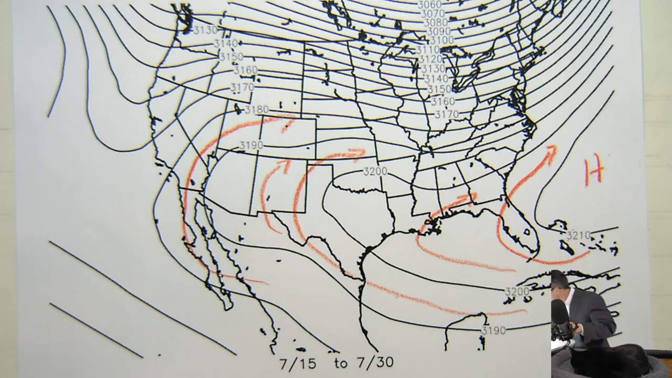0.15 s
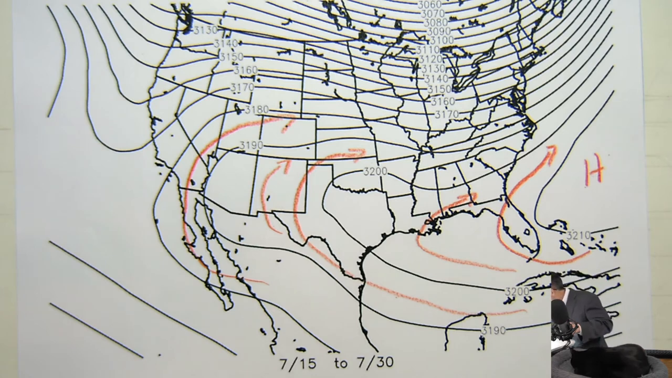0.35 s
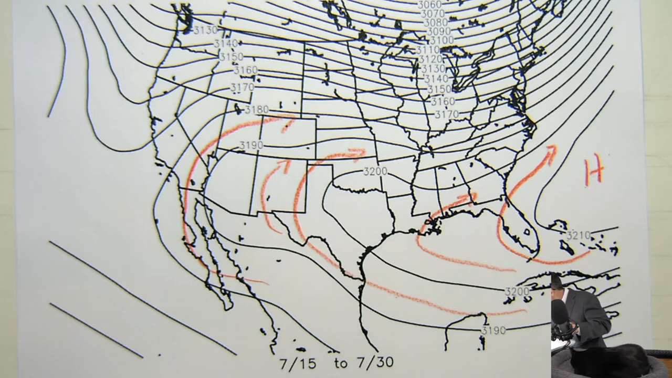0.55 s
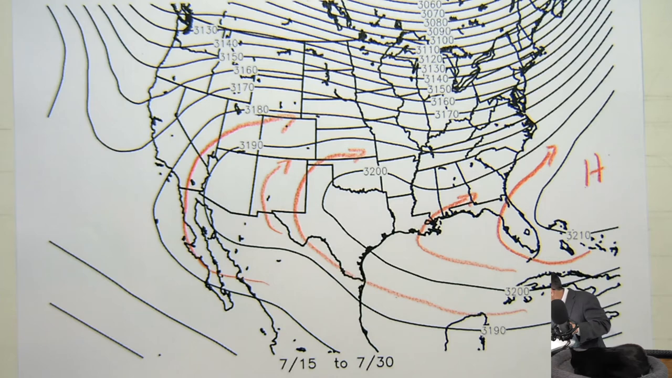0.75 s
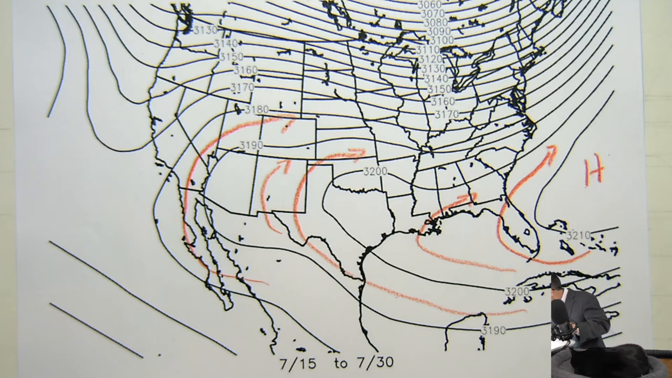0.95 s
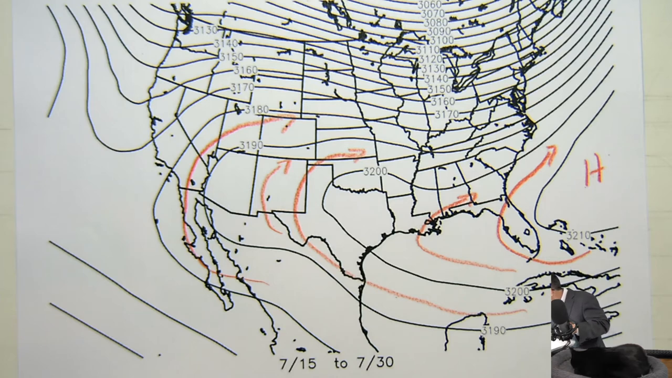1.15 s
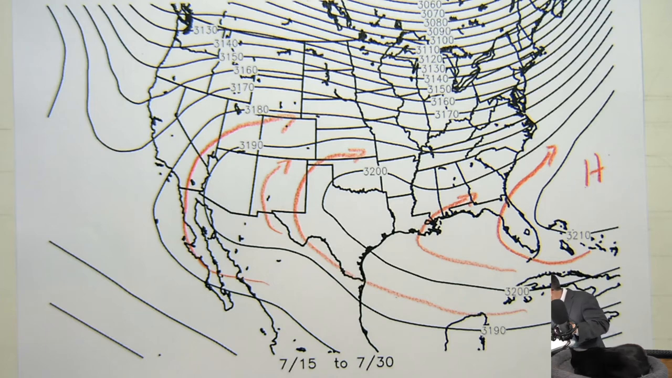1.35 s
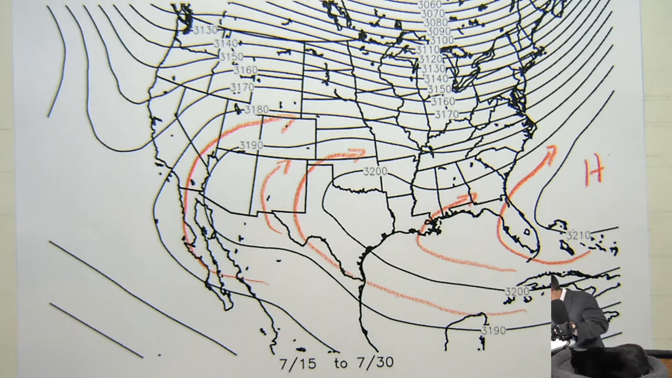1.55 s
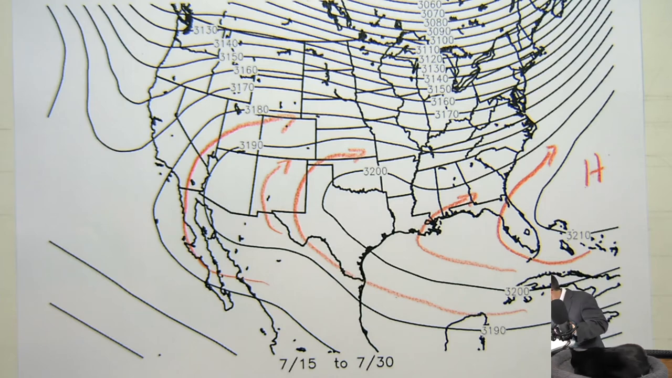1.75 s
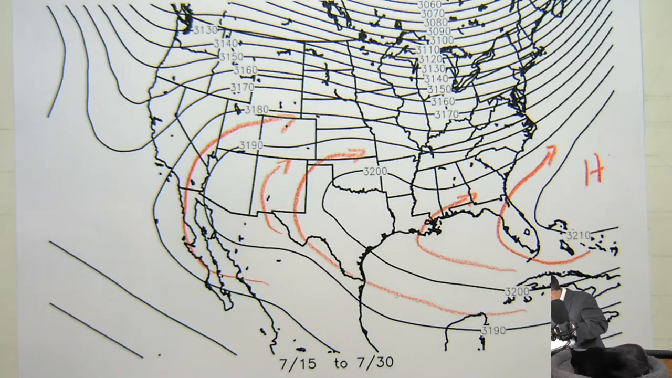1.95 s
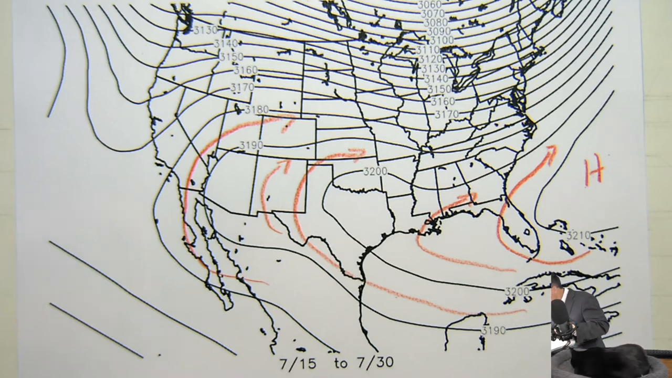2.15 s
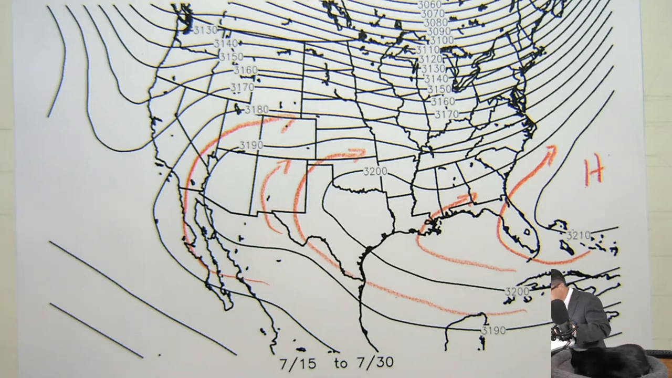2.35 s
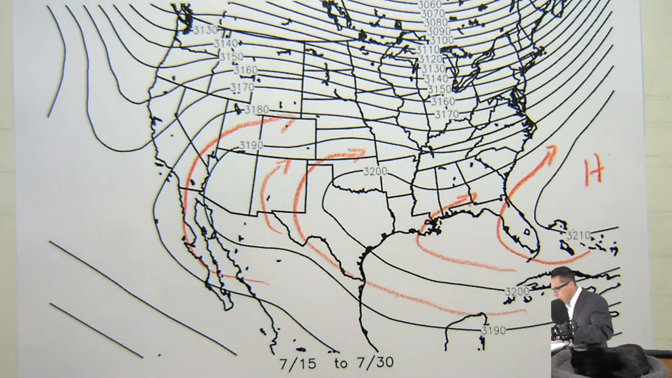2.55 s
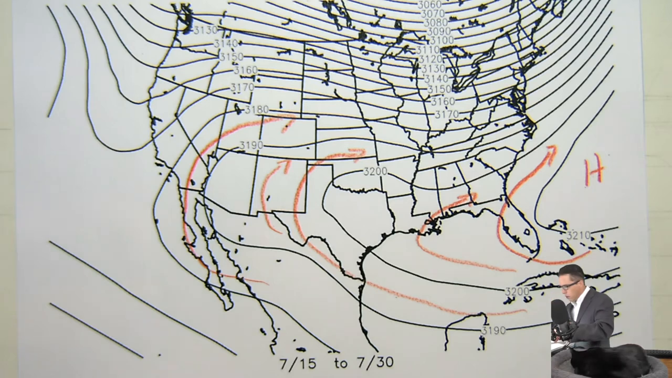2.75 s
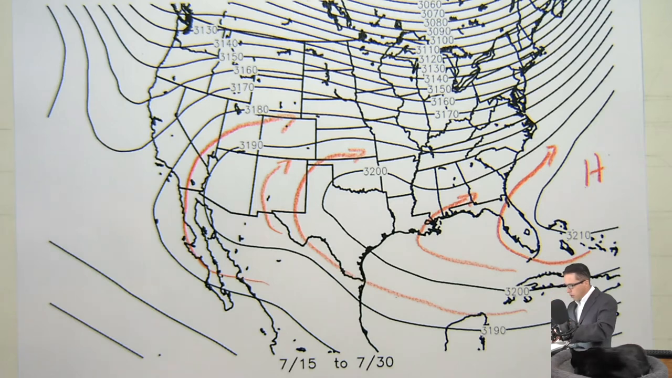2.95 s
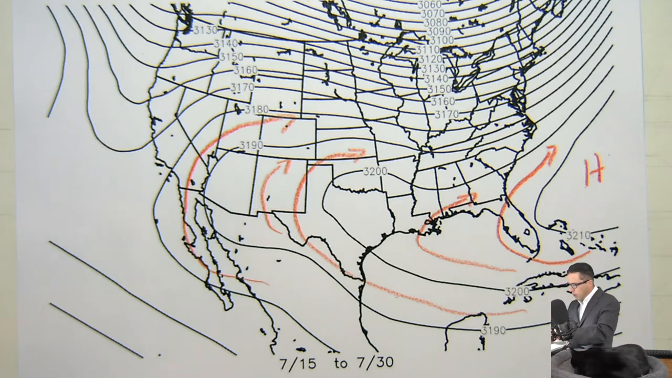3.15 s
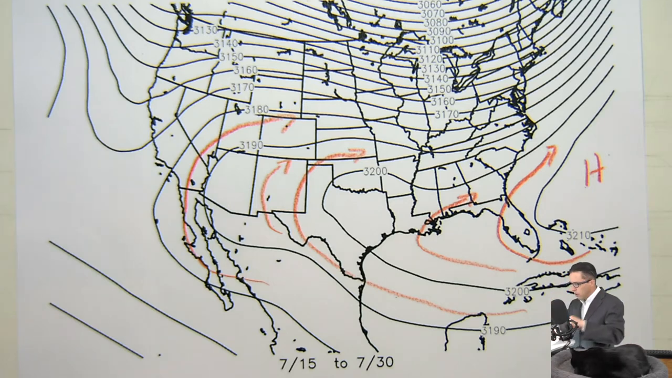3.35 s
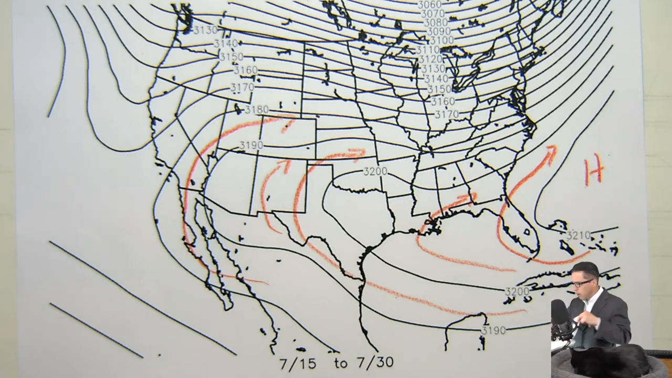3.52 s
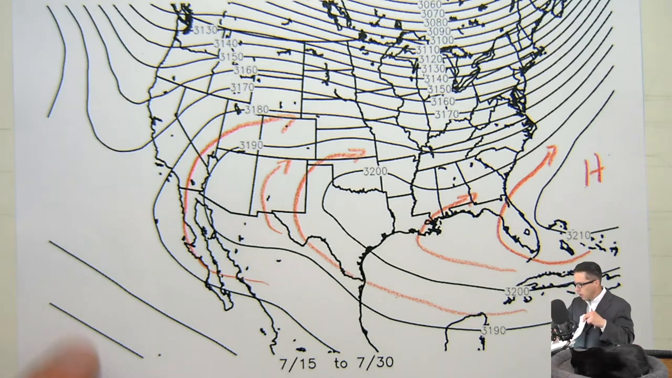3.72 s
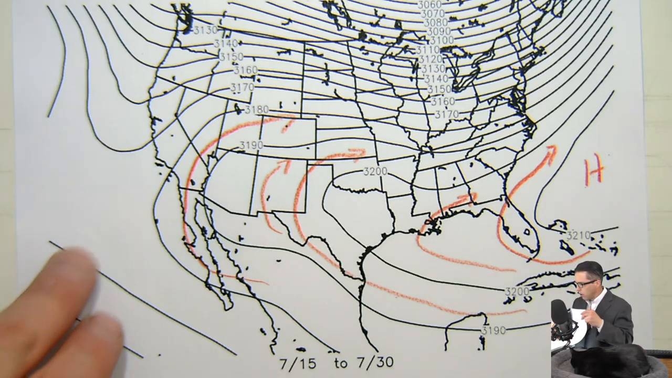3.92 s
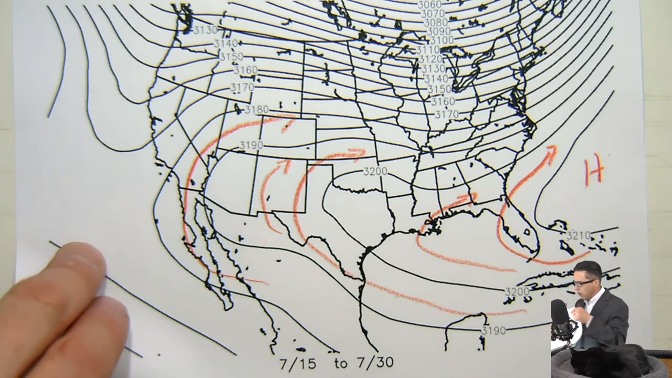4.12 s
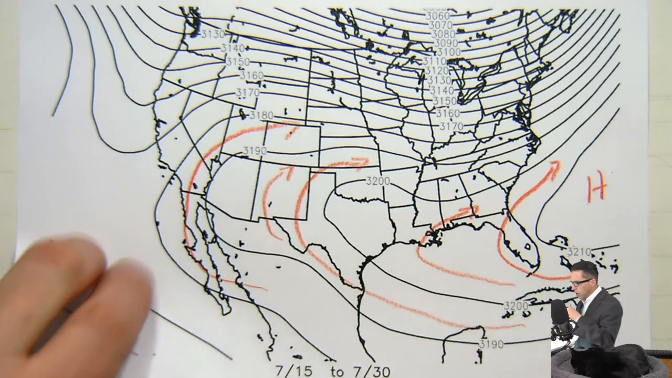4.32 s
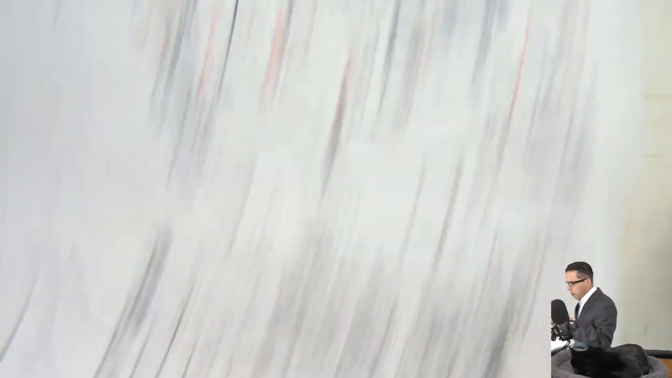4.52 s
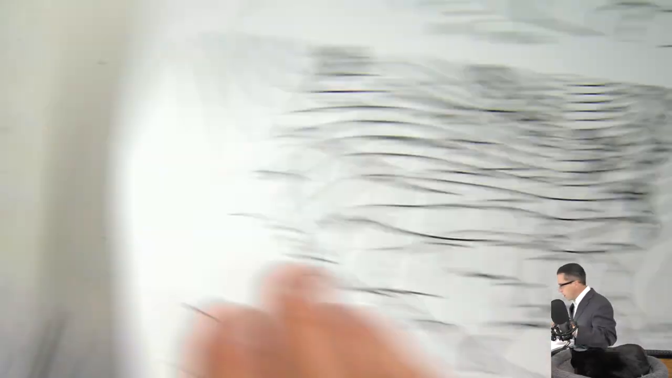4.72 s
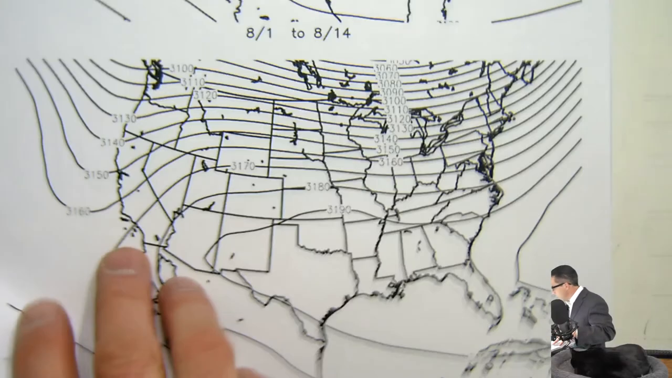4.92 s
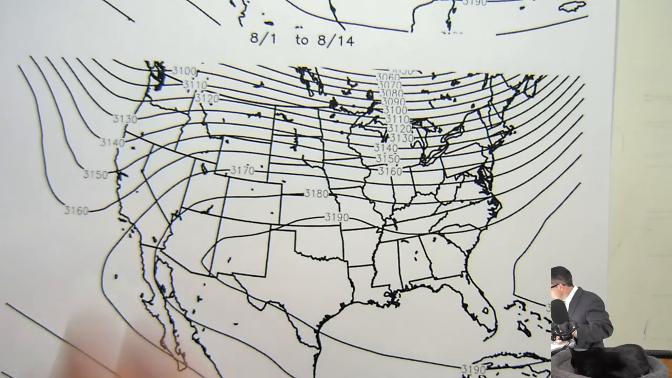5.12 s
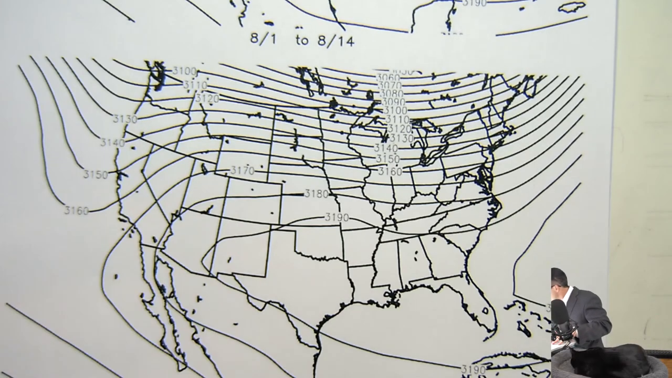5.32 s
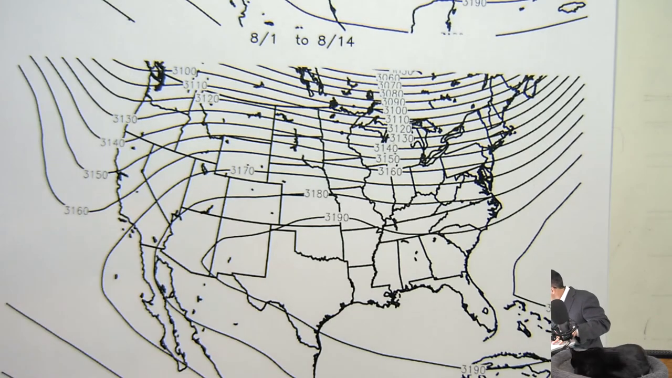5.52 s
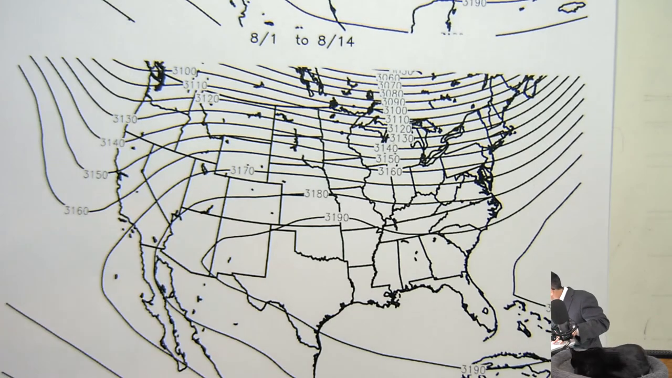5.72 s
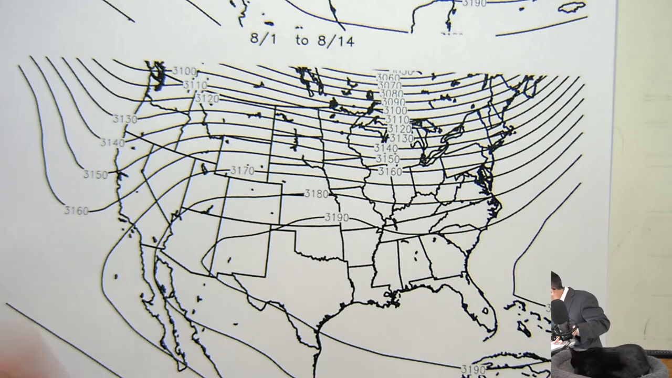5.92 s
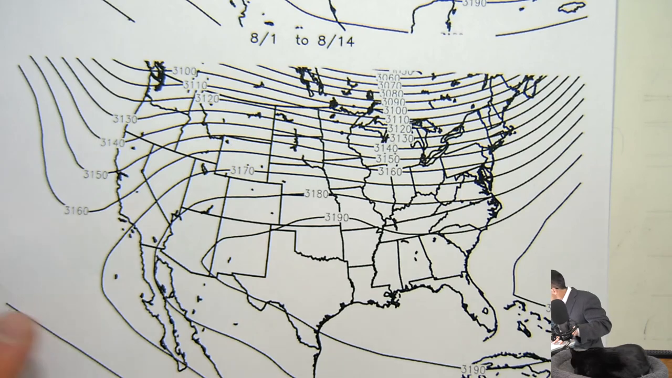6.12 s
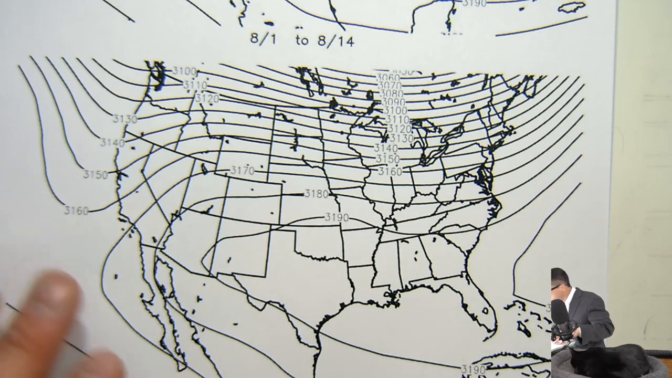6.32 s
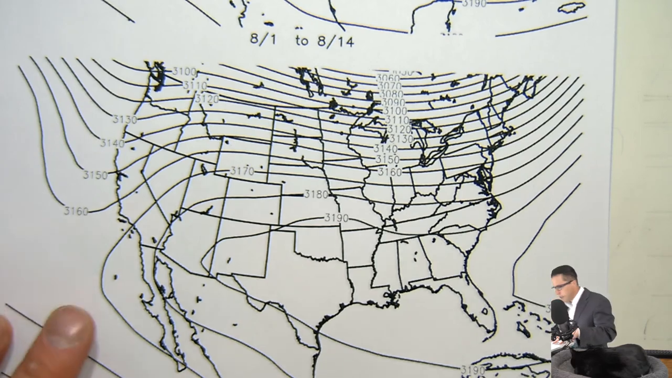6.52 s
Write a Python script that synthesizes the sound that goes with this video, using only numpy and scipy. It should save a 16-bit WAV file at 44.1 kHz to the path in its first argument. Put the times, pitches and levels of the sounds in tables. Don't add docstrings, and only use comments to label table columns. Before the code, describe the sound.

A small, dry room with a quiet low ventilation hum, a thin electronic whine and very faint low fluttering pulses repeating each second. From 0 to 1.8 s only the faintest grainy paper sliding shows above it. At 1.9 s a short crisp crinkle, then soft rubbing and tiny ticks around 2.5 s, with a dull desk thump at 2.85. At 3.1 s a hard bright snap with a swish; lighter crackles follow, then a crack and thumps at 3.6 and another at 3.7. At 4.0 s comes the loudest, sharpest crack, followed by rapid crease pops and another strong flapping cluster at 4.35. Sliding and looser crackle continue to 4.65, a small tick at 4.83, then sparse soft rustles. From 5.75 to 6.05 s a gentler crinkle with hollow pops, fading into light rubbing and hum by 6.6 s.

```python
import sys
import numpy as np
from scipy import signal
from scipy.fft import rfft, irfft, next_fast_len
from scipy.io import wavfile
from scipy.ndimage import uniform_filter1d, map_coordinates

SR = 44100
rng = np.random.default_rng(int(sys.argv[2]) if len(sys.argv) > 2 else 0)


def master_out(mix):
    frames = np.transpose(np.atleast_2d(mix))
    ceiling = np.clip(frames, -1, 1)
    pcm = np.round(ceiling * 32767).astype(np.int16)
    wavfile.write(sys.argv[1], SR, pcm)


def gain_from_db(level_db):
    decades = np.asarray(level_db, float) / 20
    return 10 ** decades


N = 289888

# (frequency [Hz], level [dB per Hz])
AIR_SPECTRUM = [(18, -11), (45, -26.5), (90, -14.5), (118, -1), (185, 0.5), (245, -5), (310, -9.5),
                (480, -10), (760, -9), (1000, -19), (1500, -19.5), (3500, -30.5), (6000, -35), (16000, -29)]
# (frequency [Hz], level [dB rms])
HUM_TONES = [(59.2, -75), (183.0, -67), (242.2, -66), (786.0, -74), (1992, -76.5), (3978, -81),
             (4597, -100.5), (5970, -96), (9954, -92), (11940, -106.5)]
# (time [s], length [s], depth [dB])
SUPPLY_SAGS = [(0.044, 0.008, -47), (0.142, .009, -47), (0.243, 0.0078, -48), (0.338, 0.012, -47),
               (0.89, 0.0051, -46), (0.904, 0.0099, -48), (0.926, 0.012, -47.5), (0.943, 0.0081, -49.5),
               (0.958, 0.0093, -45), (0.986, 0.0056, -48.5)]
# (frequency [Hz], time to fall 60 dB [s])
ROOM_DECAY = [(200, 0.23), (2000, 0.18), (10000, 0.13)]

# (centre [Hz], width [Hz], level [dB])
CREASE_MODES = [(2700, 2300, 7), (4000, 5350, 0.5)]
CAVITY_MODES = [(672, 457, 18)]
FOLD_MODES = [(1480, 1700, 0)]
SCRATCH_MODES = [(4480, 3120, -1), (9200, 5700, -0.5), (14500, 7300, -3.5)]
DESK_MODES = [(250, 460, -0.5), (431, 250, 1)]
FLAP_MODES = [(878, 796, 8), (1510, 2530, 2)]
EDGE_MODES = [(5800, 4300, 2.8), (12600, 12000, -2.5)]

# (start [s], length [s], rubbing [dB], lift [dB])
STEADY_STROKES = [(0, 0.21, -67, 7), (.9, 0.12, -78, 19), (1.191, 0.15, -69, 0), (1.45, 0.4, -71, -9),
                  (1.806, 0.29, -71, -5), (1.944, 0.064, -46.5, -10), (2.05, 0.18, -54, -5),
                  (2.246, .2, -57.5, -0.5), (2.56, 0.14, -63, 0.5), (2.722, 0.13, -68, 17),
                  (3.09, 0.048, -43.5, -1.5), (3.174, 0.16, -47, -15.5), (3.382, 0.15, -53, 1),
                  (3.608, 0.098, -43, 3), (3.78, 0.18, -52, 1.5), (4.165, 0.086, -55, 7),
                  (4.347, 0.063, -43, 3.5), (4.572, 0.11, -55.5, 11), (4.72, 0.11, -56, 1.5),
                  (4.87, 0.14, -60.5, 13.5), (5.06, 0.057, -62.5, 3), (5.15, 0.092, -69, 11),
                  (5.247, 0.12, -57.5, 4.5), (5.38, 0.12, -66.5, 10), (5.75, 0.23, -58, 5.5),
                  (6.043, 0.1, -55.5, 1), (6.3, .35, -65.5, 3.5)]
# (start [s], length [s], rubbing [dB], lift [dB], growth [dB/s])
SPEEDING_STROKES = [(2.865, 0.12, -56.5, 1.5, 22), (2.98, 0.12, -52, -22, 135), (3.72, 0.052, -45, -9, 13),
                    (3.845, .15, -44, -4.5, 25), (4.04, 0.073, -49.5, -28.5, 36),
                    (4.45, 0.095, -43.5, -10, 8), (5.56, 0.19, -75, 10, 44), (6.19, 0.13, -61, -3, 5)]
# (level over the rubbing [dB], share of the lift [1], rest level [dB])
PAPER_ANSWERS = [
    (-2.5, .15, -78),
    (-3.5, 0.98, -66),
    (-5.5, 0.54, -81),
    (-1.53, .01, -76.5),
]

# (time [s], peak level [dB], rise [ms], time to fall 60 dB [ms])
TAUT_BURSTS = [(.285, -68.5, 12, 180), (1.6, -69, 10, 130), (1.745, -75, 15, 130), (1.82, -67.5, 28, 250),
               (4.27, -55.5, 19, 120), (1.904, -36, 2.8, 56), (1.907, -30, 6.5, 26),
               (1.914, -30.5, 5.4, 207), (2.135, -50.5, 13, 260), (3.03, -70, 23.9, 119),
               (3.0755, -28, 1.5, 60), (3.0839, -18, 0.42, 34), (3.09, -31.5, 1.8, 94),
               (3.164, -44, 3.3, 43), (3.512, -46, 16, 380), (3.592, -18.5, 0.6, 17),
               (3.597, -33, 0.92, 150), (3.705, -34.5, 0.5, 18), (4.326, -58, 0.44, 12),
               (4.344, -45.5, 3.3, 44), (4.459, -44.5, 6.2, 65), (4.5, -46, 19, 66), (4.53, -45.5, 8, 57),
               (5.288, -47.5, 3.3, 100), (5.742, -44, 8.4, 340), (5.94, -52, 27, 180),
               (6.218, -59.5, 32, 300)]
FOLDED_BURSTS = [(2.706, -60, 6, 40), (3.484, -64, 1.3, 15), (3.597, -25.5, 1, 83),
                 (3.7045, -24.5, 1.3, 35), (3.712, -41, 4.6, 93), (4.0002, -10, 1.2, 22),
                 (4.0011, -10, 1.15, 11), (4.014, -37, 5, 60), (4.095, -39.5, 11, 90),
                 (4.112, -33.5, 9.5, 40), (4.122, -30.5, 3.1, 48), (4.1545, -29.5, 1.6, 70),
                 (4.173, -35.5, 5, 66), (4.325, -27.5, 1.2, 36), (4.331, -20.5, 2.3, 26),
                 (4.352, -17.5, 2.7, 28), (4.356, -21, 0.89, 86), (4.395, -41.5, 7.6, 88),
                 (4.59, -44.5, 15, 290), (4.63, -49, 14, 150), (4.965, -64, 5.3, 82),
                 (5.791, -43, 10.4, 118), (5.816, -46.5, 5.9, 380), (6.06, -52, 9.8, 130)]
SLACK_BURSTS = [(2.44, -61.5, 28, 290), (2.49, -66, 20, 90), (2.706, -70, 6.3, 57), (3.412, -51.5, 0.5, 15),
                (3.484, -54.5, 2.9, 42), (4.008, -51.5, 8, 194), (4.173, -41.5, 2.6, 46),
                (4.2, -51, 12, 28), (4.351, -36.5, 2.6, 87), (4.575, -50.5, 16, 260),
                (4.828, -30.5, 0.24, 14.4), (4.832, -44, 3.8, 177), (4.925, -59, 26, 81),
                (4.961, -47.5, 2.6, 54), (4.971, -49, 2, 92), (5.023, -57.5, 2.8, 110), (5.13, -64, 20, 80),
                (5.4, -64, 14, 150), (5.743, -49, 2, 220), (5.766, -38.5, 13.4, 220),
                (5.875, -53.5, 6.7, 77), (5.895, -59, 8.5, 280), (5.958, -56, 19, 210),
                (5.989, -53, 5.7, 53), (6.012, -60, 9.3, 67)]

# (time [s], level [dB], centre [Hz], time to fall 60 dB [ms])
STRUCK_PANELS = [(3.413, -57.5, 1094, 22), (1.911, -29, 3820, 110), (1.912, -30.5, 636, 91),
                 (1.91, -27, 10000, 130), (2.636, -56, 5500, 15), (3.078, -26, 3400, 41),
                 (3.0838, -14.5, 4810, 20), (3.084, -24.5, 9500, 75), (3.593, -22, 4400, 19),
                 (3.592, -31, 930, 99), (3.644, -28.5, 716, 51), (3.705, -28.5, 6100, 37),
                 (4.0003, -13, 3700, 16), (4.0004, -18, 2400, 30), (4.0005, -21, 942, 30),
                 (4.0005, -25.5, 560, 34), (4.175, -35, 1720, 100), (4.232, -52, 7500, 18),
                 (4.273, -48, 5540, 13), (4.355, -28, 1940, 83), (5.2, -48.5, 750, 820)]
# (time [s], level [dB], centre [Hz], time to fall 60 dB [ms])
RUBBED_PANELS = [(.61, -64, 4700, 120), (1.24, -64, 7500, 200), (1.485, -66, 6200, 60),
                 (1.535, -63.5, 6650, 90), (1.75, -65, 6000, 89.4), (3.03, -54, 6230, 70),
                 (3.04, -40, 3030, 122), (3.37, -49, 1520, 79.3), (3.92, -40.5, 2800, 300),
                 (4.59, -39, 1910, 121), (4.965, -45, 3080, 85), (5.77, -44, 1030, 171),
                 (5.785, -31.5, 2600, 111), (5.895, -40, 1860, 67), (6.0, -42, 1510, 75.4),
                 (3.355, -49, 4970, 148), (3.44, -52, 3380, 200), (5.99, -48, 2530, 250),
                 (6.2, -59, 4126, 399), (5.43, -60, 1307, 250), (2.97, -52, 485, 298),
                 (3.54, -45, 3100, 170), (2.45, -51, 880, 230), (2.455, -51, 1400, 200),
                 (2.73, -59, 1350, 500), (2.8, -50.5, 600, 400), (3.6, -44, 1560, 200),
                 (4.175, -45, 620, 300), (5.83, -48, 1500, 400), (5.99, -49, 1150, 250),
                 (3.45, -51, 4800, 120)]
# (time [s], peak level [dB], pitch [Hz], time to fall 60 dB [s])
DESK_THUMPS = [(2.46, -45.5, 286, 0.18), (2.846, -33, 237, 0.19), (2.9, -40.5, 258, 0.16),
               (3.078, -30.5, 227, 0.091), (3.595, -33.5, 264, .08), (3.644, -24.5, 269, 0.065),
               (3.345, -46, 200, 0.078), (2.632, -47.5, 328, 0.075), (2.865, -41, 300, .1),
               (4.0004, -19, 390, 0.017), (4.001, -28.5, 134.6, 0.016), (6.07, -52.5, 298, 0.122),
               (1.912, -43, 189.5, 0.14), (1.915, -46, 335, 0.13), (4.352, -25.5, 274, 0.041),
               (4.34, -36, 470, .08), (3.47, -45, 330, .15), (3.6, -40, 150, .2), (4.58, -50.5, 297, 0.25)]
# (time [s], peak level [dB], pitch [Hz], time to fall 60 dB [ms])
CREASE_POPS = [(2.4715, -40, 890, 60), (2.489, -41, 880, 40), (2.711, -45, 780, 30), (2.846, -44, 650, 33),
               (3.0841, -10, 3100, 10), (3.0841, -9, 4600, 12), (3.0841, -8, 6890, 12),
               (3.092, -18, 3100, 35), (3.123, -27, 3600, 14), (2.147, -40, 2060, 50),
               (3.166, -37.5, 820, 76), (3.384, -39, 2200, 25), (3.4139, -33, 1100, 20),
               (3.489, -37, 755, 50), (3.527, -30, 2890, 15), (3.558, -38, 700, 15), (3.857, -34, 2670, 16),
               (4.0001, -14, 520, 22), (4.0005, 0, 2700, 10), (4.0005, -20, 9000, 6),
               (4.0018, -2, 2300, 16), (4.0017, -3, 4000, 12), (4.1242, -20, 3280, 14),
               (4.1574, -20, 2800, 16), (4.1612, -24, 2100, 16), (4.181, -27, 2300, 14),
               (4.204, -32, 1900, 10), (4.21, -29, 1700, 10), (4.222, -39, 720, 25), (4.232, -40, 760, 25),
               (4.3325, -16, 2290, 25), (4.354, -15, 1930, 14), (4.354, -20, 5800, 12),
               (4.36, -11, 2120, 15), (4.3655, -21, 2900, 20), (4.372, -20, 1000, 22),
               (4.401, -31, 790, 34), (4.469, -28, 6200, 10), (4.59, -34, 760, 110), (4.972, -35, 1110, 25),
               (5.028, -42, 876, 25), (5.225, -44, 700, 40), (5.297, -35.5, 720, 30), (5.412, -43, 850, 30),
               (5.7445, -31, 900, 30), (5.772, -29, 950, 50), (5.799, -25, 2590, 14),
               (5.883, -33, 1050, 22), (5.897, -34, 1100, 30), (5.963, -35, 2760, 40),
               (5.971, -35, 1000, 25), (6.001, -33, 1340, 30), (6.023, -36, 1250, 18)]


def unit(x):
    return x / np.sqrt(np.mean(x ** 2, axis=-1, keepdims=True) + 1e-20)


def along(points, hz):
    f, values = np.transpose(points)
    return np.interp(np.log(hz + 1), np.log(f + 1), values)


def wobble(rate):
    knots = rng.standard_normal(int(N * rate / SR) + 4)
    return map_coordinates(knots, [np.arange(N) * rate / SR])


def filtered(x, response):
    size = next_fast_len(N + SR // 2)
    return irfft(rfft(x, size) * response(np.fft.rfftfreq(size, 1 / SR)), size)[..., :N]


def resonant(x, modes):
    def once(f):
        total = 0
        for k, (centre, width, db) in enumerate(modes):
            mode = 1j * f * width / (centre * centre - f * f + 1j * f * width)
            total = total + (-1) ** k * gain_from_db(db) * mode
        return total

    norm = np.sqrt(np.mean(np.abs(once(np.linspace(0, SR / 2, num=2000))) ** 4))
    return filtered(x, lambda f: once(f) ** 2 / norm)


def swell(t, rise, life):
    onset = np.sin(np.pi / 2 * np.clip(t / rise, 0, 1)) ** 2
    return onset * gain_from_db(-60 * np.maximum(t - rise, 0) / life)


def fibres(clump_db, spike_db):
    size = gain_from_db(clump_db * wobble(45) + spike_db * wobble(600))
    return unit(size * rng.standard_normal(N))


def background():
    noise = unit(filtered(rng.standard_normal(N), lambda hz: gain_from_db(along(AIR_SPECTRUM, hz))))
    air = gain_from_db(-58.5 + 1.0 * wobble(1.4)) * noise
    t = np.arange(N) / SR
    tones = np.zeros(N)
    for hz, db in HUM_TONES:
        waver_db = 2.5 if hz < 1000 else 0.6
        level = gain_from_db(db + 2.5 + waver_db * wobble(5.8))
        tones += level * np.sin(2 * np.pi * hz * t + 1.6 * wobble(11.0))
    return air + tones


def strokes(rows, t, attack_db_per_s, release_db_per_s, crease_db, fold_db):
    start, length, rub_db, lift_db, *growth = np.transpose(rows)[..., None]
    shape_db = rub_db + sum(growth) * np.clip(t - start, 0, length)
    shape_db = shape_db - attack_db_per_s * np.maximum(start - t, 0)
    shape_db = shape_db - release_db_per_s * np.maximum(t - start - length, 0)
    powers = []
    for (over_db, share, _), extra_db in zip(PAPER_ANSWERS, (crease_db, 0, fold_db, 0)):
        level = gain_from_db(shape_db + over_db + extra_db + share * lift_db)
        powers.append(np.sum(level ** 2, axis=0))
    return np.array(powers)


def patchy(x, depth_db):
    z = signal.stft(x, nperseg=256)[2]
    field = rng.standard_normal(z.shape)
    field = uniform_filter1d(field, size=4, axis=0)
    field = uniform_filter1d(field, size=14, axis=1)
    return signal.istft(z * gain_from_db(depth_db * field / field.std()), nperseg=256)[1][:N]


def rustle():
    t = np.arange(0, N + 64, 64) / SR
    power = strokes(STEADY_STROKES, t, attack_db_per_s=398.5, release_db_per_s=168.5, crease_db=0, fold_db=0)
    power = power + strokes(SPEEDING_STROKES, t, attack_db_per_s=702.5, release_db_per_s=499,
                            crease_db=-0.5, fold_db=-6.5)
    gains = []
    for part_power, (_, _, rest_db) in zip(power, PAPER_ANSWERS):
        gains.append(np.interp(np.arange(N) / SR, t, np.sqrt(part_power + gain_from_db(rest_db) ** 2)))
    paper = np.zeros(N)
    for gain, modes in zip(gains, (CREASE_MODES, CAVITY_MODES, FOLD_MODES, SCRATCH_MODES)):
        paper += gain * resonant(fibres(clump_db=1.7, spike_db=1.24), modes)
    desk = gain_from_db(-7.0) * gains[1] * resonant(fibres(clump_db=2.5, spike_db=4.0), DESK_MODES)
    return patchy(paper, depth_db=2.0) + desk


def supply():
    cycle_s, low_hz, high_hz = 1.001, 9, 140
    phase = np.arange(N) / SR % cycle_s
    dips = np.zeros(N)
    for s, length, db in SUPPLY_SAGS:
        dips -= gain_from_db(db) * ((phase > s) & (phase < s + length))
    return filtered(dips, lambda f: 1j * f / (low_hz + 1j * f) / (1 + 1j * f / high_hz) ** 2)


def snaps():
    drive = np.zeros((3, N + SR))
    t = np.arange(SR // 3) / SR
    life_ratio = np.array([[0.99], [1.3], [0.8]])
    states = ((TAUT_BURSTS, -11, 2.5), (FOLDED_BURSTS, -16.5, -17), (SLACK_BURSTS, 8.5, -31.5))
    for bursts, body_db, edge_db in states:
        for s, db, rise_ms, t60_ms in bursts:
            part_db = np.array([[0], [body_db - 0.0259 * (db + 30)], [edge_db]])
            burst = gain_from_db(db + part_db) * swell(t, rise_ms / 1000, t60_ms / 1000 * life_ratio)
            start = round(s * SR)
            drive[:, start:start + len(t)] += burst
    out = np.zeros(N)
    for part, modes in zip(drive, (CREASE_MODES, FLAP_MODES, EDGE_MODES)):
        out += resonant(part[:N] * fibres(clump_db=0.5, spike_db=1.5), modes)
    return out


def panels():
    out = np.zeros(N + SR)
    t = np.arange(SR // 2) / SR
    f = np.fft.rfftfreq(len(t), 1 / SR)
    for rings, rise, width in ((STRUCK_PANELS, 0.036, 0.23), (RUBBED_PANELS, 0.125, 0.34)):
        for s, db, hz, t60_ms in rings:
            band = 1 / (1 + (2 * (f / hz - 1) / width) ** 2)
            ring = unit(irfft(rfft(rng.standard_normal(len(t))) * band, len(t)))
            life = t60_ms / 1000
            out[round(s * SR):][:len(t)] += gain_from_db(db) * ring * swell(t, rise * life, life)
    return out[:N]


def thumps():
    out = np.zeros(N + SR)
    t = np.arange(SR // 3) / SR
    for s, db, hz, t60 in DESK_THUMPS:
        ring = np.zeros(len(t))
        for ratio, level_db in ((1, 0.5), (1.2, -2), (1.8, -8.5)):
            ring += gain_from_db(level_db) * np.sin(2 * np.pi * hz * ratio * t)
        soft_start = 1 - np.exp(-t / 0.002)
        out[round(s * SR):][:len(t)] += gain_from_db(db - 60 * t / t60) * soft_start * ring
    return out[:N]


def pops():
    out = np.zeros(N + SR)
    t = np.arange(SR // 10) / SR
    for s, db, hz, t60_ms in CREASE_POPS:
        ring = np.sin(2 * np.pi * hz * t) + gain_from_db(-7.5) * np.sin(2 * np.pi * hz * 1.23 * t)
        out[round(s * SR):][:len(t)] += gain_from_db(db - 3) * ring * swell(t, 0.00037, t60_ms / 1000)
    return out[:N]


def room(x):
    hz, t, z = signal.stft(rng.standard_normal(SR // 2), SR, nperseg=256)
    fade = gain_from_db(-60 * t / along(ROOM_DECAY, hz)[:, None])
    tail = signal.istft(z * fade, SR, nperseg=256)[1]
    delayed = np.pad(x, (260, 0))
    return signal.fftconvolve(delayed, tail / np.linalg.norm(tail))[:N]


def scene():
    paper = snaps() + panels() + pops() + thumps()
    mix = paper + gain_from_db(-19.5) * room(paper) + rustle() + background() + supply()
    return mix[None]


def roll_off(x):
    return signal.sosfilt(signal.butter(12, 16330, fs=SR, output="sos"), x)


def record(dry):
    top_hz, slope_hz = 15900, 150
    clipped = np.clip(dry, -1, 1)
    limited = filtered(clipped, lambda hz: np.clip((top_hz - hz) / slope_hz, 0, 1) ** 2)
    return roll_off(limited)


dry = scene()
out = record(dry)
master_out(out)
```